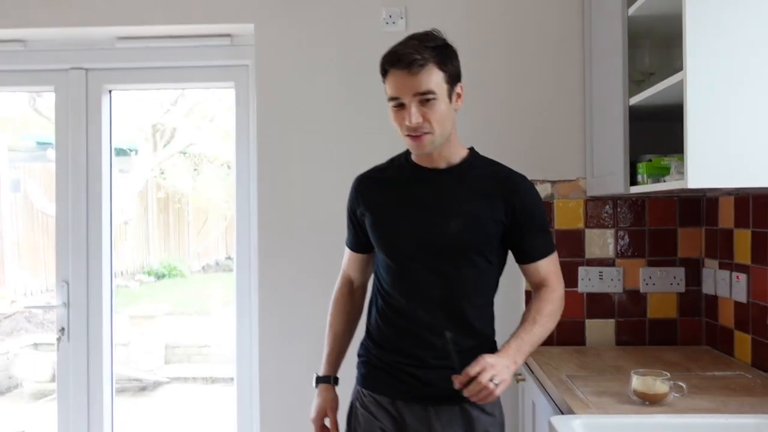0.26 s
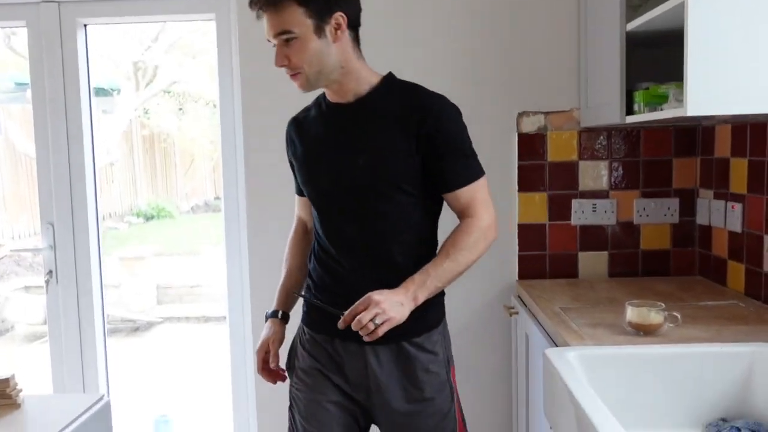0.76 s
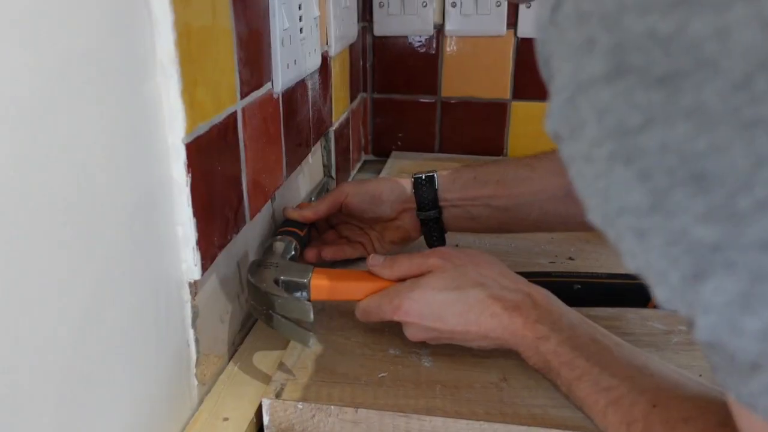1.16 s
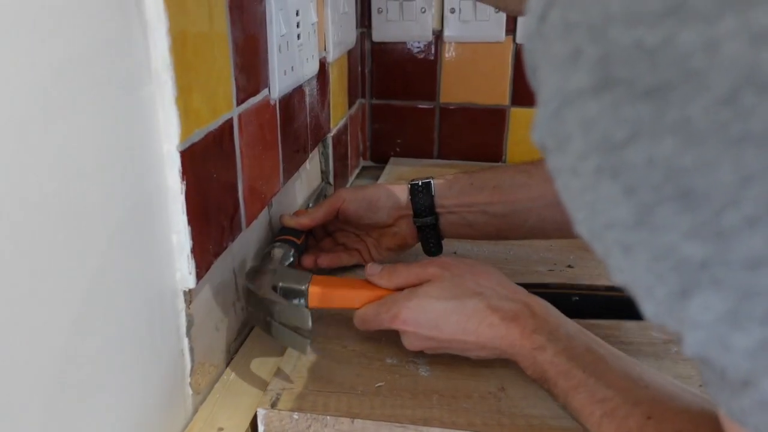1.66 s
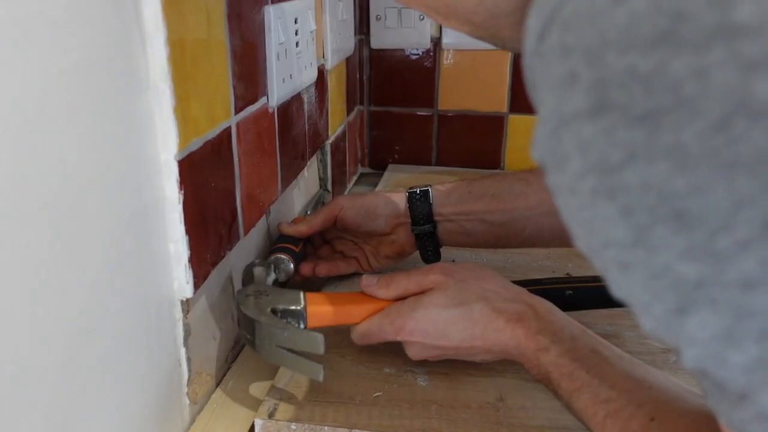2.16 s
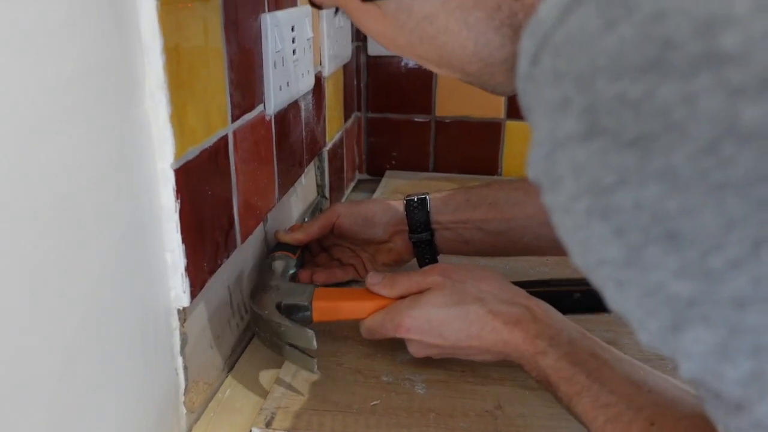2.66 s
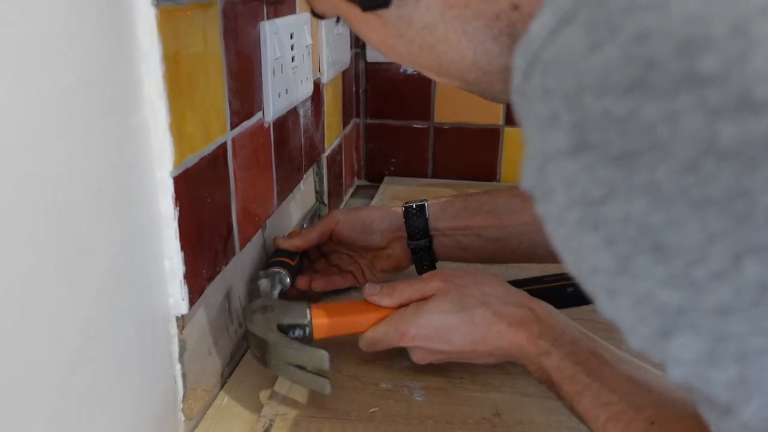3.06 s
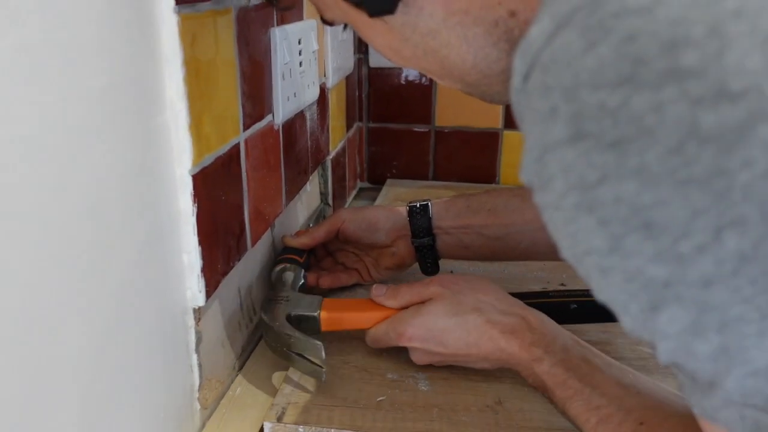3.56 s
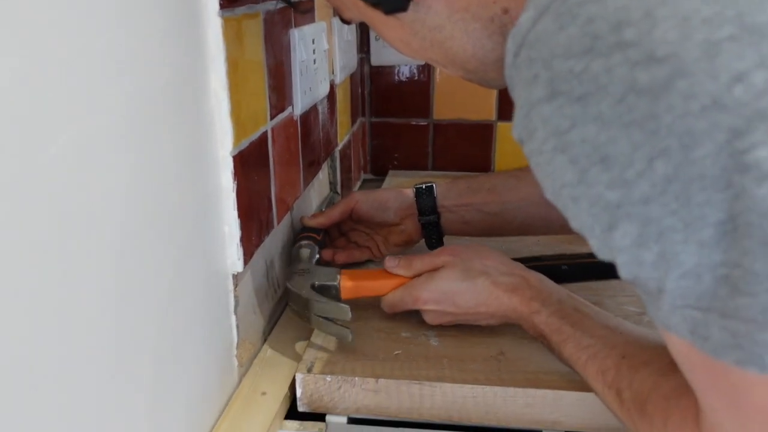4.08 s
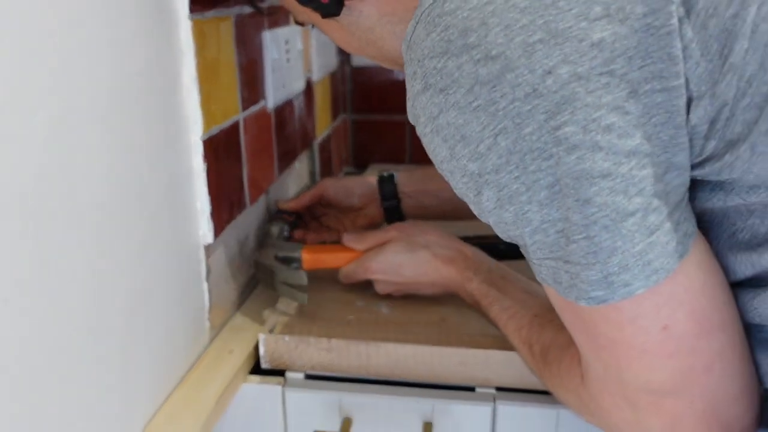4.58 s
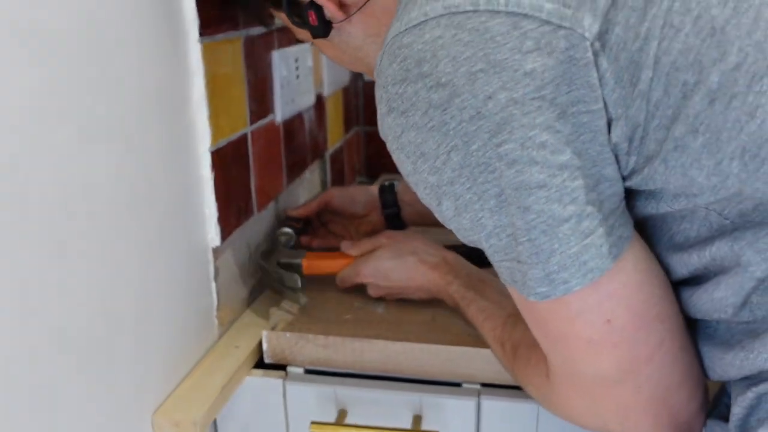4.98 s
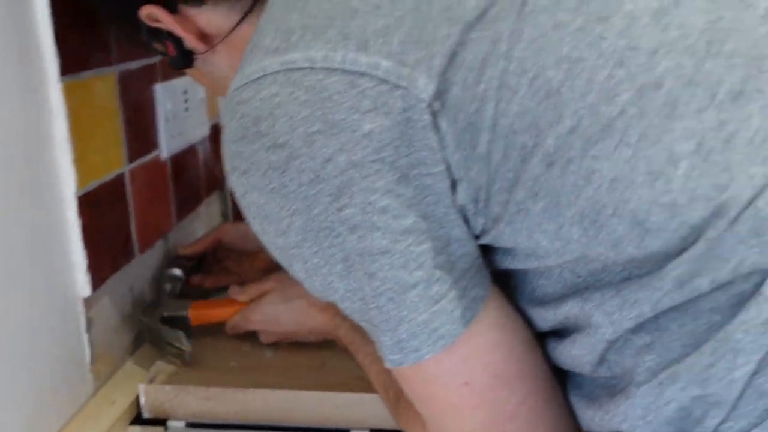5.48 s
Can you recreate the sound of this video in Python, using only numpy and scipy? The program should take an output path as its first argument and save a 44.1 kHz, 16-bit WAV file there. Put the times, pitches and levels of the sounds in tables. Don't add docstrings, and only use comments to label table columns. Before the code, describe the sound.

From 0 to 1 s, a bare kitchen has faint airy room tone. A shoe lands softly near 0.4 s, then grit and cloth swish, with a sharp click and main scuff around 0.7 s and tiny ticks near 0.9 s. At 0.98 s the sound cuts to a closer, slightly fuller background. A lighter hammer tap at 1.0 s is followed by small ticks and dull knocks at 1.2 and 1.3 s. From 1.7 s, firm blows on a steel chisel repeat about every 0.22 s, easing to 0.25 s by the end at 5.6 s. They crack and clink, with a thin high steel ring swelling between them. Tile buzz and bright clang peak around 3 to 3.4 s; after 3.8 s the chisel sounds more wedged, drier and knockier. Hard walls give quick echoes and a short tail that pumps up after each compressed blow.

```python
import sys
import numpy as np
from scipy import signal
from scipy.fft import rfft, irfft, next_fast_len
from scipy.io import wavfile
from scipy.ndimage import uniform_filter1d, minimum_filter1d

SR = 44100
rng = np.random.default_rng(int(sys.argv[2]) if len(sys.argv) > 2 else 0)


def invert_db(x):
    u = np.asarray(x, float) / 20
    return 10 ** u


def file_out(sig):
    cols = np.atleast_2d(sig).T
    lim = np.clip(cols, -1, 1)
    pcm = np.round(lim * 32767).astype(np.int16)
    wavfile.write(sys.argv[1], SR, pcm)


N = 252693
SCENE_CHANGE_S = 0.981


def read(points, hz):
    f, value = np.transpose(points)
    return np.interp(np.log(hz + 1), np.log(f + 1), value)


def along(rows, s):
    t, *columns = np.transpose(rows)
    return [np.interp(s, t, column) for column in columns]


def curve(rows, column):
    rows = np.array(rows)
    return np.interp(np.arange(N) / SR, rows[:, 0], rows[:, column], -120, -120)


def evened(x):
    return x / np.sqrt(np.mean(x ** 2) + 1e-20)


def unit(x):
    return x / np.linalg.norm(x)


def add(mix, s, sound):
    part = mix[round(s * SR):][:len(sound)]
    part += sound[:len(part)]


def causal(db):
    log_gain = np.log(invert_db(np.maximum(np.r_[db, db[-2:0:-1]], -100)))
    return np.fft.ifft(np.exp(np.conj(signal.hilbert(log_gain)))).real[:len(db)]


def coloured(x, points):
    size = next_fast_len(x.shape[-1])
    gain = invert_db(read(points, np.fft.rfftfreq(size, 1 / SR)))
    return irfft(rfft(x, size) * gain, size)[..., :x.shape[-1]]


# hz, side_minus_mid_db
WIDTH = [(60, -44), (110, -42), (200, -40), (380, -19.5), (700, -12.5), (1290, -9), (2380, -9.5),
         (4400, -8), (8120, -6.5), (15000, -4)]


def pair(mid, side, side_db):
    side = invert_db(side_db) * coloured(side, WIDTH)
    return np.array([mid + side, mid - side])


def mode(hz, t60, phase, seconds):
    t = np.arange(round(seconds * SR)) / SR
    decay = invert_db(-60 * t / max(t60, .002))
    return unit(decay * np.sin(2 * np.pi * hz * t + phase * np.minimum(t * hz, 1)))


def ring(hzs, modes, spread_db, wander, chance):
    return sum(invert_db(db + spread_db * c) * mode(hz * (1 + wander * c), t60, 0, .25)
               for hz, (db, t60), c in zip(hzs, modes, chance))


# hz, t60_s
REVERBERATION = [(100, 0.46), (300, 0.36), (1000, 0.46), (2500, 0.49), (6000, 0.44), (9000, 0.37),
                 (12000, 0.34), (16000, 0.42)]


def room(x, gap_s):
    taps = np.zeros((2, SR))
    at = np.arange(0, SR - 12, 12) + rng.integers(0, 12, (2, (SR - 1) // 12))
    np.put_along_axis(taps, at, rng.choice([-1., 1.], at.shape), 1)
    hz, t, z = signal.stft(taps, SR, nperseg=256)
    decay = invert_db(-60 * t / read(REVERBERATION, hz)[:, None])
    tail = signal.istft(z * decay, SR, nperseg=256)[1][:, :SR]
    tail *= 1 - np.exp(-np.arange(SR) / SR / gap_s)
    return signal.fftconvolve(x[None], tail / np.linalg.norm(tail[0]), axes=1)[:, :N]


# pitch_hz, level_db, t60_s
STANDING_WAVES = [(157.1, -14, 0.64), (207.6, -10.5, 0.81), (242, -28, 0.44), (305, -3.5, 0.41),
                  (316.2, -1, 0.53), (352, -10, 0.56), (406, -4.5, 0.28), (426, 0, .32), (499, -9, 0.81)]


def standing(x):
    t = np.arange(SR) / SR
    level_db, life = -4.5, 0.698
    waves = np.zeros(SR)
    for k, (hz, db, t60) in enumerate(STANDING_WAVES):
        decay = invert_db(db - 60 * t / np.clip(life * t60, .08, .7))
        waves += (-1) ** k * decay * np.sin(2 * np.pi * hz * t)
    return invert_db(level_db - 17.5) * signal.fftconvolve(x, unit(waves))[:N]


def rub(points, grit_db, level_db):
    grains = rng.standard_normal((2, N)) * invert_db(grit_db * np.minimum(rng.exponential(1, N), 5))
    mid, side = coloured(grains, points)
    scale = invert_db(level_db) / np.std(mid)
    return pair(scale * mid, scale * side, 3.4)


# hz, density_db_per_hz
AIR_OPEN = [(15, -69), (25, -16), (190, -11), (591, -8), (863, -1), (1290, -7), (1650, -9.5), (2690, -16.5),
            (5730, -16), (12200, -32), (16000, -20)]
# hz, density_db_per_hz
AIR_WALL = [(25, -40), (120, -18), (200, 6), (300, -3), (900, 0.5), (2000, -1), (4400, -15), (6000, -18),
            (16000, -33)]


def room_tone():
    second = np.arange(N) / SR > SCENE_CHANGE_S
    return np.where(second, rub(AIR_WALL, 0.38, -54.5), rub(AIR_OPEN, .3, -58))


def strokes(rows):
    t = np.arange(N) / SR
    power = np.zeros(N)
    for s, rise, db, fall in rows:
        swell = np.sin(np.pi / 2 * np.clip((t - s) / max(rise, .002), 0, 1)) ** 2
        power += (swell * invert_db(db - fall * np.maximum(t - s - rise, 0))) ** 2
    return 10 * np.log10(power * (t < SCENE_CHANGE_S) + 1e-12)


# hz, density_db_per_hz
SOLE_COLOUR = [(47, -76.5), (80, -57), (271, -24.5), (413, -24), (504, -23), (877, -21), (1950, -12),
               (5520, -18.5), (16000, -54)]
# hz, density_db_per_hz
SWISH_COLOUR = [(350, -45), (600, -16), (906, -25), (1960, -31), (2120, -19), (2310, -16), (6030, -6),
                (10700, -12.5), (16000, -32)]
# start_s, rise_s, level_db, fall_db_per_s
SOLE_STROKES = [
    (.379, 0.034, -33, 81),
    (.575, .02, -63, 100),
    (.69, 0.011, -55, 54),
    (.895, 0.015, -50.5, 52),
]
# start_s, rise_s, level_db, fall_db_per_s
SWISH_STROKES = [
    (.305, .01, -66, 120),
    (.385, 0.033, -55, 25),
    (.57, .025, -44, 40),
    (.685, 0.042, -39.5, 35.4),
    (.9, 0.083, -59, 90),
]


def shoe():
    drag = rub(SOLE_COLOUR, 3.3, strokes(SOLE_STROKES) + 4.7)
    swish = rub(SWISH_COLOUR, 1.5, strokes(SWISH_STROKES) + 1.2)
    return drag + swish


# start_s, level_db, pitch_hz, t60_s, room_db
GRIT_TICKS = [
    (.309, -60, 4900, .05, -6),
    (0.6833, -10.5, 2700, 0.0033, -33),
    (.8856, -25, 7000, .005, -15),
    (0.9073, -29, 1700, 0.012, -11),
    (.9184, -26, 4400, 0.0039, -15),
    (0.9982, -24, 1940, 0.013, 9),
    (1.213, -23, 1600, 0.017, 2),
    (1.302, -37, 1850, 0.023, 10),
]
# start_s, level_db, pitch_hz, t60_s, room_db
SOFT_KNOCKS = [
    (0.389, -43, 106, 0.053, -6),
    (0.537, -47, 430, 0.055, -14),
    (.908, -33, 395, 0.02, 2.5),
    (1.215, -27.5, 455, 0.013, 5),
    (1.305, -29.5, 420, 0.018, 6.5),
]


def small_things():
    dry, wet = np.zeros((2, N))
    for s, db, hz, t60, room_db in GRIT_TICKS + SOFT_KNOCKS:
        sound = mode(hz, t60, 0, .1)
        sound = sound + .8 * mode(1.85 * hz, .8 * t60, 0, .1)
        sound = sound + .45 * mode(3.05 * hz, .6 * t60, 0, .1)
        sound *= 1 - np.exp(-np.arange(len(sound)) / SR * hz / 0.65)
        sound *= invert_db(db) / abs(sound).max()
        add(dry, s, sound)
        add(wet, s, invert_db(room_db) * sound)
    mid, side = room(wet, 0.0021)
    return pair(dry + mid, side, 0.59)


def ring_level():
    swell_db_per_s, sag_db_per_s, droop_s, linger_db = 28, 33, 0.085, -7
    t, level = np.arange(N) / SR, np.zeros(N)
    for s, _, _, crest_db, crest_s in HAMMER_BLOWS:
        late = t - s - crest_s
        droop_db = np.maximum(-10 * (late / droop_s) ** 3, linger_db)
        shape_db = np.where(late < 0, swell_db_per_s * late, droop_db - sag_db_per_s * late)
        level[t >= s] = invert_db(crest_db + shape_db)[t >= s]
    return uniform_filter1d(level, 300)


def head_ring():
    head_hz, waver_hz = 5604, 0.88
    waver = evened(uniform_filter1d(uniform_filter1d(rng.standard_normal(N), 2500), 2500))
    turn = 2 * np.pi * np.cumsum(head_hz + waver_hz * waver) / SR
    level = np.sqrt(2) * invert_db(-0.3) * ring_level()
    return level * np.array([np.sin(turn - .12), np.sin(turn + 0.35)])


# hz, density_db_per_hz
TAP_COLOUR = [(88, -36), (150, -6), (309, -2), (545, -20), (928, -4), (1380, -10.5), (1700, 0), (2180, -9),
              (2540, -4), (3250, -12), (3930, -5), (4320, -23.5), (6430, -12), (10300, -28), (14000, -42)]
# hz, density_db_per_hz
LOOSE_COLOUR = [(47, -60), (80, -19), (156, -9), (493, -3.5), (877, 8), (1070, -3), (1490, 2), (4050, -6),
                (4620, -10), (5770, -8), (7530, -19.5), (12800, -45), (16000, -62)]
# hz, density_db_per_hz
PRISING_COLOUR = [(59, -46.5), (100, -1.5), (149, -5.5), (370, -4), (411, 1), (774, -13), (1550, -14),
                  (1840, -7.5), (2580, -16.5), (4100, -15.5), (4660, -20), (5630, -18.5), (6000, -19.5),
                  (8950, -25), (15500, -53)]
# hz, density_db_per_hz
SEATED_COLOUR = [(47, -41.5), (80, -47.5), (152, -3.5), (413, 5), (601, -2), (2430, -2), (3700, -14.5),
                 (4140, -11), (5280, -17.5), (5770, -8), (6310, -20.5), (7870, -12.5), (12800, -31),
                 (16000, -59)]
WALL_PITCHES = [156, 205, 307, 424]
# level_db, t60_s
WALL_MODES = [(-20, .05), (-16, .05), (-14, .045), (-13, .05)]
PING_PITCHES = [2900, 4017, 5190]
# level_db, t60_s
PING_MODES = [(-13, 0.038), (-10, 0.13), (-13.5, 0.018)]
CLANG_PITCHES = [6450, 7900, 8400, 9200, 10050, 11650, 12600]
# level_db, t60_s
CLANG_MODES = [(-37, 0.022), (-35, 0.024), (-47, 0.02), (-32, 0.012), (-31.5, 0.0057), (-37, 0.12),
               (-46, 0.034)]


def blow(stage, free, tilt_db, tile_hz, tile_db, ping_db, clang_db, boom_db, crack_db, chance):
    sheen_hz, sheen_width, sheen_share = 8540, 0.18, 0.43
    banding_db, banding_hz, crack_top_hz = 2.2, 420, 9400
    hz = np.fft.rfftfreq(2048, 1 / SR)
    stages = [TAP_COLOUR, LOOSE_COLOUR, PRISING_COLOUR, SEATED_COLOUR]
    colour = sum(max(1 - abs(stage - k), 0) * read(points, hz) for k, points in enumerate(stages))
    colour += tilt_db * np.log2(hz / 2000 + .5)
    colour += sheen_share * clang_db * np.exp(-(np.log((hz + 1) / sheen_hz) / sheen_width) ** 4)
    colour += banding_db * np.interp(hz, 1900 + banding_hz * np.arange(36), np.r_[0, chance[70:105]])

    pings = [(db, t60 * np.clip(free, .1, 2)) for db, t60 in PING_MODES]
    steel = invert_db(ping_db + 14.5) * ring(PING_PITCHES, pings, 2.7, 0.0018, chance)
    steel = steel + invert_db(0.2 * clang_db - 0.5) * ring(CLANG_PITCHES, CLANG_MODES, 2.4, 0.0081, chance[9:])
    body = invert_db(boom_db) * ring(WALL_PITCHES, WALL_MODES, 0.57, 0.024, chance[19:])
    for detune in (-0.0325, -0.02, 0.00011, 0.0286, 0.0414):
        body += invert_db(tile_db) * mode(tile_hz * (1 + detune), 0.2, chance[60] * detune * 99, .25)
    knock = invert_db(-2.0) * steel + body
    crack = invert_db(6.5) * steel + invert_db(-4.0) * body
    add(knock, 0, unit(causal(colour)))

    t = np.arange(len(chance)) / SR
    contact = chance * np.exp(-t / .0008) * (1 - np.exp(-t / .0003))
    colour += 40 * np.log10(np.clip(hz / 900, .03, 1))
    colour -= 10 * np.log10(1 + (hz / crack_top_hz) ** 4)
    add(crack, 0, invert_db(crack_db) * unit(np.convolve(causal(colour), contact)))
    return np.array([knock, crack])


# start_s, level_db, chisel_ping_db, head_crest_db, crest_after_blow_s
HAMMER_BLOWS = [(1.008, -12, -23, -48.5, 0.093), (1.693, -3.5, -20, -29, 0.05),
                (1.913, -5.5, -20, -24.5, 0.15), (2.129, -6, -21, -31, 0.17), (2.343, -6, -27, -22.5, 0.13),
                (2.551, -6.5, -22.5, -21, 0.16), (2.768, -6.5, -17.5, -21, 0.14),
                (2.981, -6.5, -19, -24, 0.13), (3.201, -7.5, -17, -27.5, 0.15),
                (3.425, -8, -20.5, -24, 0.11), (3.645, -7, -18, -32.5, 0.026),
                (3.877, -6.5, -21.5, -31.5, 0.091), (4.103, -7.5, -23, -27.5, .11),
                (4.339, -7, -23, -26, 0.096), (4.583, -6.5, -21, -26, 0.15),
                (4.836, -6.5, -22.5, -28, 0.15), (5.09, -6.5, -24, -27, 0.19),
                (5.349, -6, -31, -26.5, 0.18), (5.601, -5, -40, -26.5, 0.042)]
# start_s, stage (0 tap, 1 loose, 2 prising, 3 seated), tilt_db_per_octave, clang_db, crack_db
CHISEL_STATE = [(1.0, 0.55, 2.5, 1, 13.5), (1.69, 1.47, 5, -9, 10.5), (1.92, 2.94, 5.5, -17.5, -4.5),
                (2.13, 2.57, 2.8, -9.5, -5.5), (2.35, 2.33, 2.9, -3.5, -6.5), (2.55, 2.1, 2, -1, -9.5),
                (2.98, 2.12, 0.75, 11, -6.5), (3.43, 2.4, -0.3, 15.5, -2), (3.64, 2.8, 0, 2, -5.5),
                (4.6, 3.16, 0.2, -2, -1.5), (5.6, 4.1, 0.8, -7, 2)]
# start_s, buzz_hz, buzz_db, boom_db
TILE_STATE = [
    (1.0, 1766, -23, 1.5),
    (1.69, 1710, -29, -8.5),
    (1.92, 1720, -28, -3.5),
    (2.3, 1700, -31, 2.5),
    (2.55, 1850, -19, -2),
    (2.98, 1830, -10, -2.5),
    (3.43, 1895, -14, 2),
    (3.8, 1910, -27, -4),
    (5.6, 1884, -23, -5),
]
# delay_s, level_db
REFLECTIONS = [(.0013, -33), (.0022, 1.5), (.0038, -3.5), (.0058, -9.5), (.0075, -41), (.0098, -25.5),
               (0.017, -68)]


def hammer():
    wedged_s, free_ping, wedged_ping = 3.76, 0.77, 0.35
    trial_s, trial_crack_db = 1.8, -6
    tracks, direct = np.zeros((3, N)), np.zeros(N)
    chances = rng.standard_normal((len(HAMMER_BLOWS), 200))
    for k, (s, db, ping_db, *_) in enumerate(HAMMER_BLOWS):
        stage, tilt_db, clang_db, crack_db = along(CHISEL_STATE, s)
        tile_hz, tile_db, boom_db = along(TILE_STATE, s)
        free = free_ping if s < wedged_s else wedged_ping
        sounds = blow(np.clip(stage, 0, 3), free, tilt_db, tile_hz, tile_db, ping_db, clang_db,
                      boom_db, crack_db, chances[k])
        knock, crack = invert_db(28 + 1.56 * (db + 8.0)) * sounds
        crack = crack * invert_db(trial_crack_db * (s < trial_s))
        add(tracks[k % 3], s, knock)
        add(direct, s, crack)
        for j, (late_s, echo_db) in enumerate(REFLECTIONS):
            add(direct, s + late_s, (-1) ** j * invert_db(echo_db - 14.0) * crack)
    bass = signal.sosfiltfilt(signal.butter(2, 600, fs=SR, output="sos"), tracks)
    low = room(bass.sum(0), 0.0032) * invert_db([[-1], [0]])
    mid, side = low + sum(room(track, 0.00033) for track in tracks - bass)
    mid = mid + standing(bass.sum(0))
    return pair(direct + mid, side + 0.2 * direct, 0.21)


def duck_db(x, size, ceiling_db, share, back_db_per_s):
    power = uniform_filter1d((x ** 2).mean(0), size, origin=size // 2 - 1)
    power_db = 10 * np.log10(abs(power) + 1e-12)
    ahead = np.r_[power_db[95:], power_db[-95:]]
    ahead = -minimum_filter1d(-ahead, 101, origin=50)
    fall = np.arange(N) * back_db_per_s / SR
    held = np.maximum.accumulate(ahead + fall) - fall
    return -uniform_filter1d(share * np.maximum(held - ceiling_db, 0), 24)


# start_s, level_db
SCENE_FADE = [
    (0, -3),
    (.955, -3.5),
    (.972, -1),
    (.981, -45),
    (.994, -5),
    (1.0, -5),
    (6, 2),
]


def scene():
    air = room_tone()
    noise = hammer() + small_things() + shoe() + air
    slow_db = duck_db(noise, size=300, ceiling_db=-16.5, share=0.58, back_db_per_s=133)
    quick_db = duck_db(noise * invert_db(slow_db), size=30, ceiling_db=-7.5, share=1.0, back_db_per_s=890)
    dip_db = quick_db + np.minimum(slow_db - uniform_filter1d(slow_db, 3000), 0)
    ducked = noise * invert_db(slow_db + quick_db + curve(SCENE_FADE, 1))
    return ducked + head_ring() * invert_db(1.8 * dip_db)


def roll_off(x):
    return signal.sosfilt(signal.butter(12, 16480, fs=SR, output="sos"), x)


def record(dry):
    thin = signal.sosfilt(signal.butter(6, 135, "high", fs=SR, output="sos"), dry)
    overloaded = 0.9 * np.tanh(thin / 0.93)
    edge = signal.firwin(255, 16300, fs=SR)[None]
    mix = signal.oaconvolve(overloaded, edge, "same")
    return roll_off(mix)


dry = scene()
out = record(dry)
file_out(out)
```